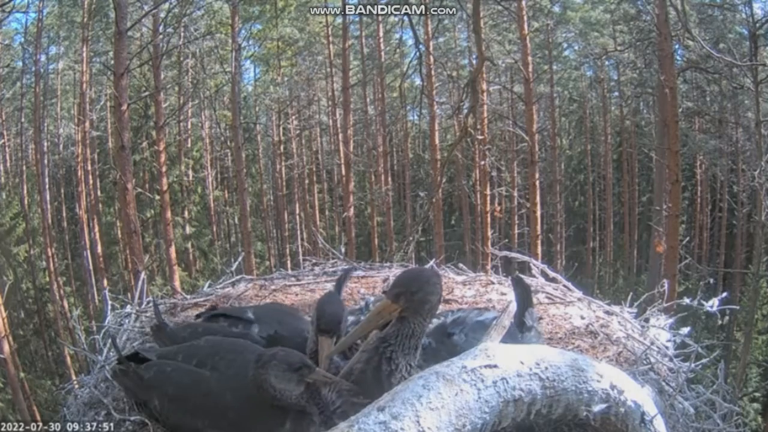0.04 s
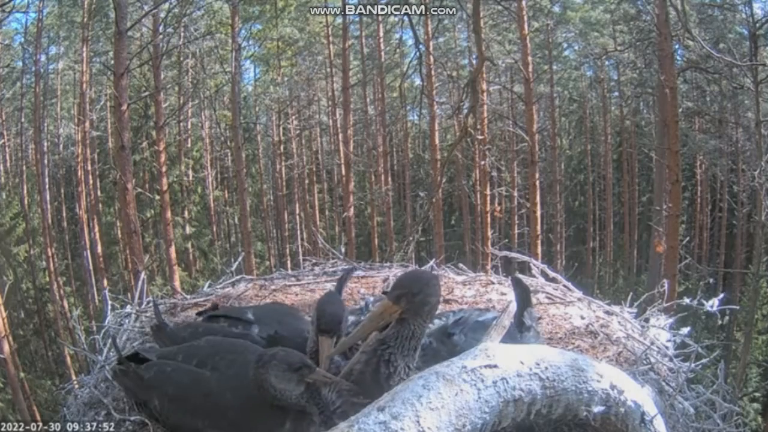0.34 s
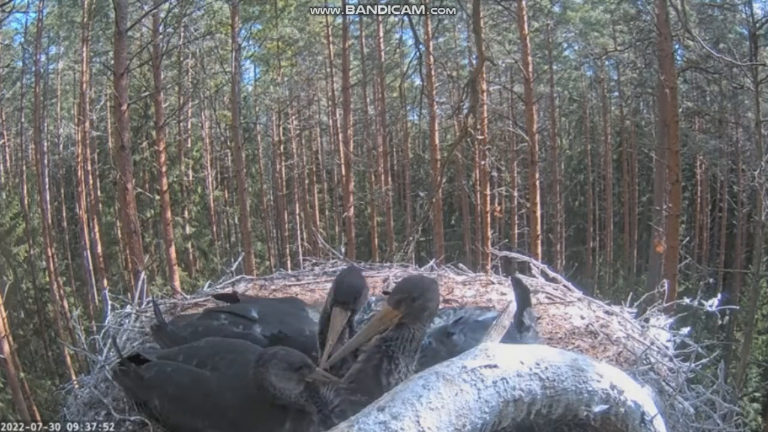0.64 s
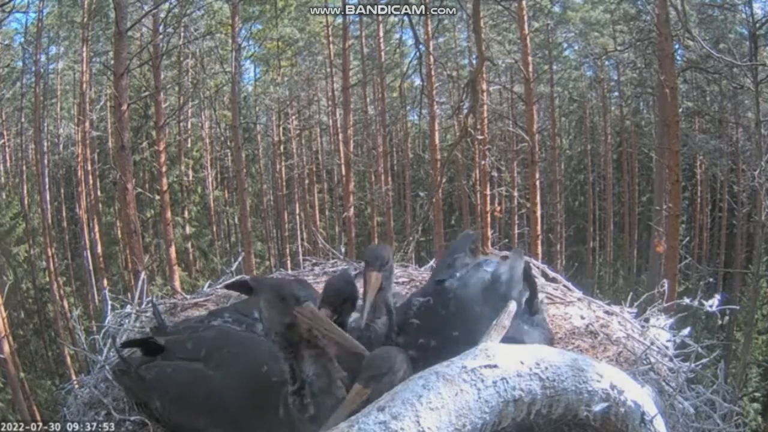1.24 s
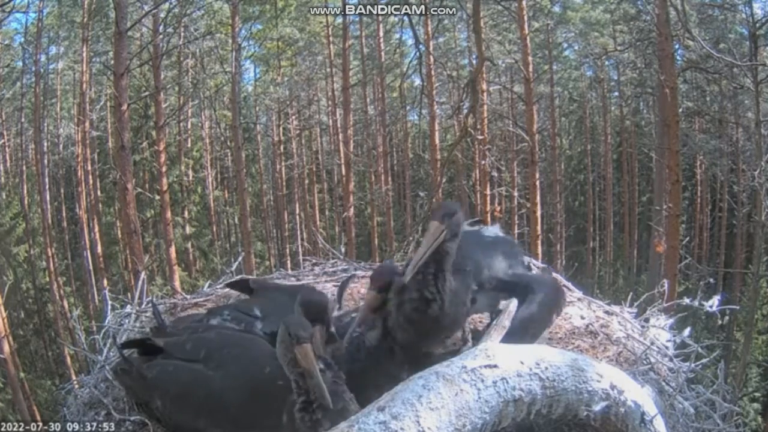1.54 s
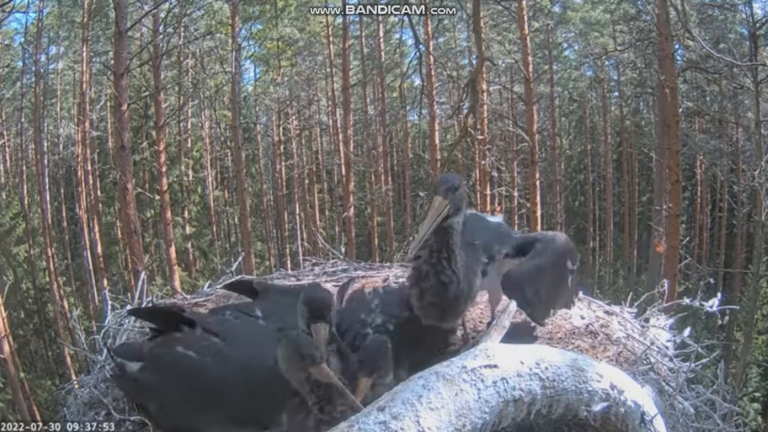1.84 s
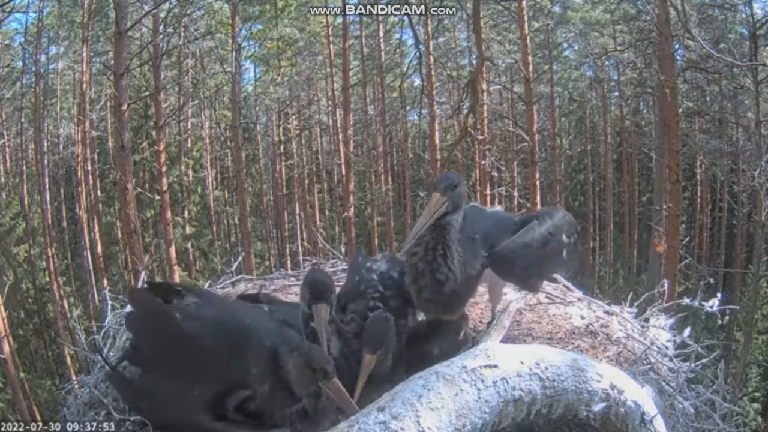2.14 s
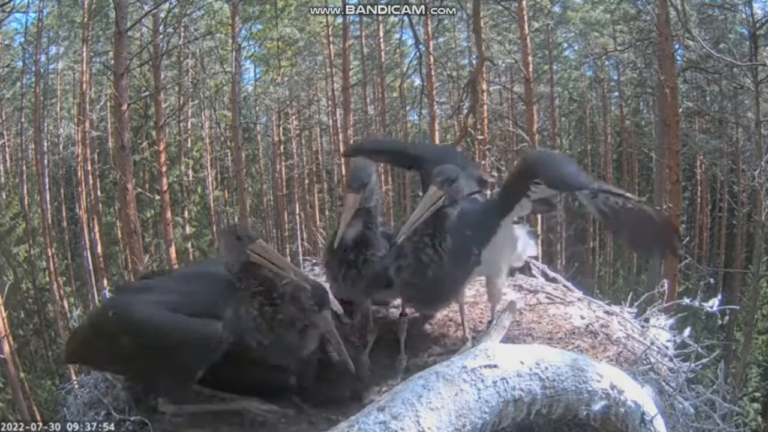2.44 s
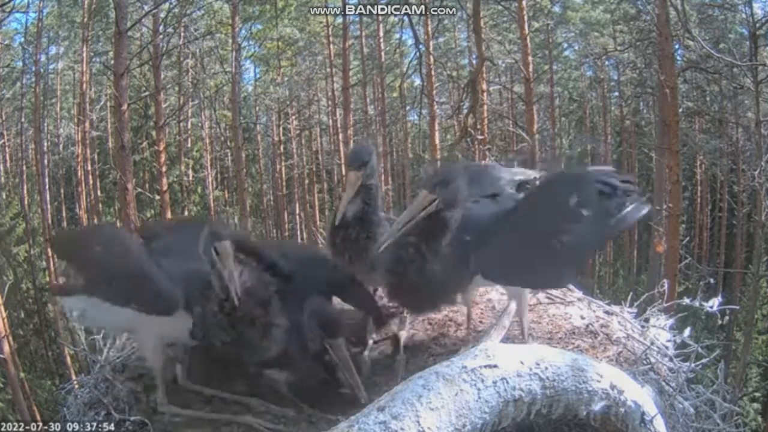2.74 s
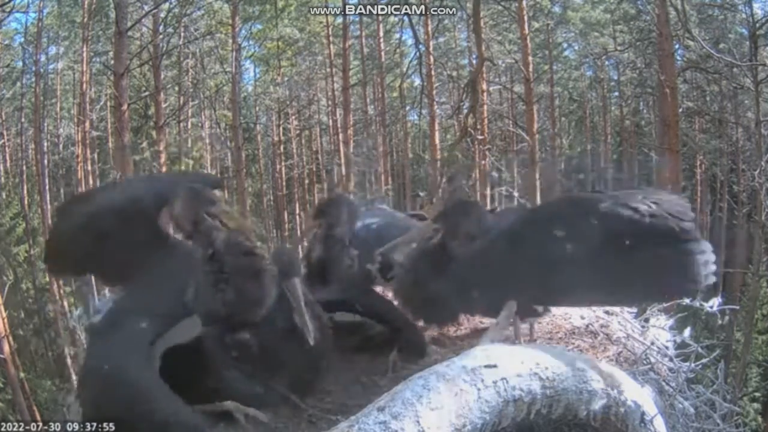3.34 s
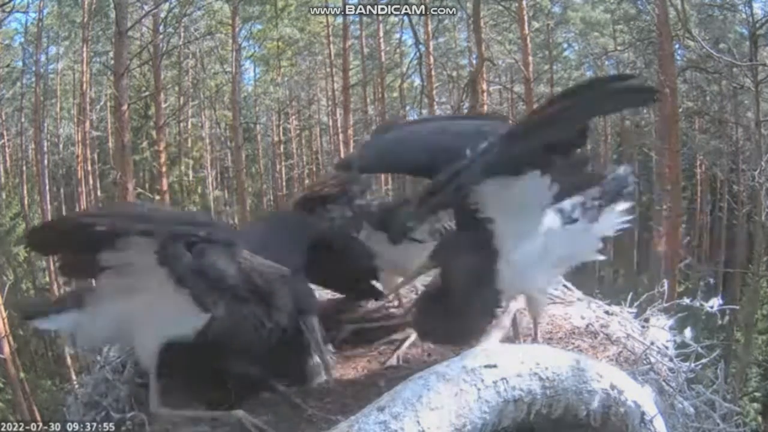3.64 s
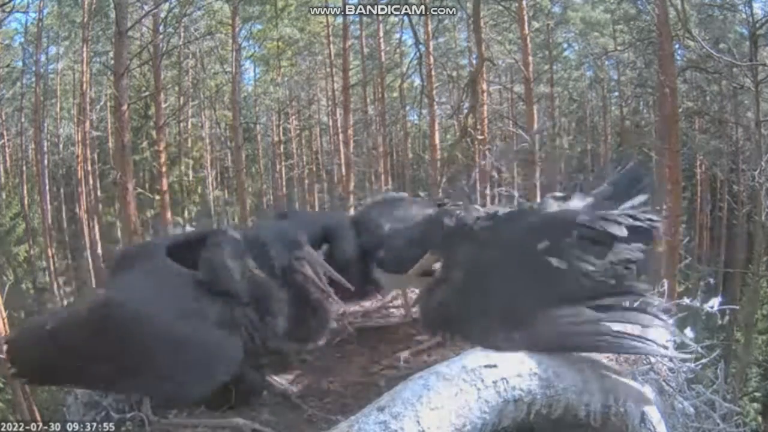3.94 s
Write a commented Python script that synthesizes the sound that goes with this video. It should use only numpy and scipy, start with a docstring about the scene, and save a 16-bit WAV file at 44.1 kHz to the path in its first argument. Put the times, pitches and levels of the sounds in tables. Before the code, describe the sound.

Young storks beg with rapid whistles and harsh rasps, flapping in a forest nest.

```python
"""A stick nest high in a quiet forest, one microphone close to the young storks in it.
They beg about nine calls a second: thin gliding whistles, short low grunts from pulses ringing the
throat, and harsh rasps where the voice breaks up. As more birds join, the rasps take over.
Close by, wings beat, feathers and twigs rustle, chicks chirp and sticks tick.
The trees return a faint echo."""
import sys
import numpy as np
from scipy import signal
from scipy.fft import rfft, irfft, next_fast_len
from scipy.io import wavfile

SR = 44100
rng = np.random.default_rng(int(sys.argv[2]) if len(sys.argv) > 2 else 0)


def master(y):
    """Save y as 16-bit WAV."""
    cut = np.clip(np.atleast_2d(y).T, -1, 1)
    pcm = np.round(cut * 32767)  # scale
    wavfile.write(sys.argv[1], SR, pcm.astype(np.int16))


N = 176400

# Rasps close to the microphone: t/s, length/s, level/dB
RASP_CALLS = [(1.646, 0.071, -51), (1.769, 0.053, -47.5), (1.861, 0.054, -50.5), (1.966, 0.039, -46),
              (2.06, 0.052, -45.5), (2.167, 0.04, -43), (2.264, 0.05, -46), (2.355, 0.076, -41),
              (2.45, 0.073, -42.5), (2.551, 0.073, -44), (2.633, 0.1, -43.5), (2.74, 0.1, -45.5),
              (2.849, 0.07, -46.5), (2.961, 0.05, -45), (3.048, 0.065, -42), (3.137, 0.053, -38.5),
              (3.23, 0.057, -38.5), (3.313, 0.16, -43), (3.488, 0.11, -44), (3.598, 0.085, -41.5),
              (3.692, 0.076, -41.5), (3.773, 0.077, -38), (3.88, 0.013, -32), (3.907, 0.035, -42.5),
              (3.979, 0.021, -49)]
def rasp(start, length, db, calm_hz=3230, frantic_hz=4112, puffs_per_s=230, note_s=.014):
    """The voice breaks into rough squeals over uneven puffs, shriller as the birds get excited."""
    n = int(length * SR)
    t = np.arange(n) / SR
    centre_hz = calm_hz + (frantic_hz - calm_hz) * (start * SR / N) ** 2
    cycles = np.cumsum(puffs_per_s * np.exp(.27 * drift(n, 150))) / SR
    gate = np.exp(-(cycles % 1) / .8)
    puffs = gate * noise(n)
    harsh = colour(resonate(puffs, centre_hz, width_hz=1800) + .4 * puffs, throat(start))
    notes = np.zeros(n)
    for s in np.arange(0, length, note_s / 2):  # overlapping scraps of tone leap about the centre
        m = int(note_s * rng.uniform(1, 1.7) * SR)
        hz = centre_hz * np.exp(.198 * rng.uniform(-1, 1)) * (1 + .0487 * drift(m, 200))
        add(notes, s - note_s / 2, np.hanning(m) * np.sin(phase_of(hz)) * rng.exponential())
    notes = colour(notes * (gate + .5), throat(start))
    voice = squeal(n, centre_hz * rng.uniform(.16, .3), wobble=.04)
    voice = colour(voice * (gate + .5), throat(start))
    edges = np.clip(np.minimum(t, length - t) / .0048, 0, 1)
    flicker = amp(drift(n, 160))
    return amp(db) * edges * unit((harsh + amp(2) * notes + amp(-5) * voice) * flicker)


# Spectrum of a young stork's throat: f/Hz, level/dB
THROAT_SPECTRUM = [(200, -35), (600, -5.5), (1050, 2), (1700, -10.5), (2300, -1), (3000, -2), (4300, -4),
                   (5200, -19.5), (6900, -42.5), (9300, -29), (15000, -50.5)]
def throat(s, squabble_s=2.76):
    """The colour of the voice at time s; its upper edge rises once the squabble breaks out."""
    stretch = 1 + .11 * np.clip((s - squabble_s) * 2, 0, 1)
    return [(hz * (stretch if 4000 < hz < 8000 else 1), db) for hz, db in THROAT_SPECTRUM]


def squeal(n, hz, wobble):
    """A hoarse, nearly held voice with a weak fundamental and uneven harmonics."""
    from_crest = np.linspace(-1, 1, n) + rng.uniform(-1, 1)
    phase = phase_of(hz * np.exp(-.04 * from_crest ** 2) * (1 + wobble * drift(n, 300)))
    return sum(min(k / 3, 1) * rng.rayleigh() * np.cos(k * phase + 2 * np.pi * rng.random())
               for k in range(1, 13))


# Whistles, close: t/s, length/s, first f/Hz, middle f/Hz, last f/Hz, level/dB
WHISTLE_CALLS = [(0.506, 0.041, 2370, 3050, 2380, -65.5), (0.6, 0.054, 2480, 2960, 2570, -57.5),
                 (0.718, 0.048, 2300, 4030, 3520, -48.5), (1.588, 0.0069, 1820, 3520, 3970, -39.5),
                 (2.083, 0.017, 2770, 3720, 4150, -40), (2.159, 0.049, 3760, 3270, 4270, -42.5),
                 (2.264, 0.029, 3920, 3340, 3730, -37), (2.46, 0.031, 3910, 3840, 4550, -32.5),
                 (2.527, 0.092, 4560, 4050, 3810, -37.5), (2.648, 0.046, 4390, 3924, 3680, -32),
                 (2.752, 0.016, 4480, 3930, 3370, -37), (3.237, 0.025, 4920, 4330, 4140, -37.5),
                 (3.268, 0.011, 3030, 3150, 3180, -35), (3.359, 0.012, 2860, 3250, 3380, -31.5),
                 (3.465, 0.019, 3830, 4050, 4250, -31.5), (3.519, 0.0092, 4500, 4300, 4600, -32),
                 (3.551, .024, 4560, 4490, 4170, -37.5), (3.682, 0.028, 9350, 9350, 9350, -55.5),
                 (3.756, 0.015, 4460, 4480, 4430, -38), (3.776, 0.012, 4530, 4420, 4360, -34)]
def whistle(length, first_hz, middle_hz, last_hz, db):
    """A nearly pure tone bends through three pitches, fluttering, in a thin band of air noise."""
    n = int(length * SR)
    u = np.linspace(0, 1, n)
    bend = np.polyfit([0, .5, 1], [first_hz, middle_hz, last_hz], 2)
    hz = np.polyval(bend, u) * (1 + .014 * drift(n, 360))
    phase = phase_of(hz)
    flutter = 1 + .75 * np.tanh(drift(n, 520))
    tone = unit((np.sin(phase) + amp(-38.5) * np.sin(2 * phase)) * flutter)
    air = colour(resonate(noise(n), hz, width_hz=900), THROAT_SPECTRUM)
    return amp(db) * abs(np.sin(np.pi * u)) ** .77 * (tone + amp(-30) * air)


# Twitters, close: t/s, length/s, top f/Hz, landing level/dB
TWITTER_CALLS = [(.595, 0.098, 4350, -52), (0.746, 0.045, 5000, -39), (0.814, 0.09, 4750, -39),
                 (0.931, 0.062, 4300, -48), (0.973, 0.029, 4700, -37), (1.016, 0.084, 5000, -49),
                 (1.122, .1, 4740, -48), (1.778, 0.067, 4490, -40.5), (1.862, 0.075, 5000, -39.5),
                 (1.952, 0.086, 5100, -39.5), (2.055, 0.093, 4980, -40), (2.174, 0.079, 4900, -40.5),
                 (2.276, 0.092, 4880, -37), (2.986, 0.089, 5150, -34), (3.83, .06, 5900, -36.5),
                 (3.938, 0.069, 5500, -38)]
def twitter(length, top_hz, db, foot_hz=3430, fade_db_per_hz=.012, swell_db=7, ragged_db=5):
    """A ragged tone arches up from the throat's resonance, fades at the top and lands loudly again."""
    n = int(length * SR)
    u = np.linspace(0, 1, n)
    lift_hz = (top_hz - foot_hz) * np.sin(np.pi * np.minimum(u / .9, 1)) ** 2
    phase = phase_of((foot_hz + lift_hz) * (1 + .022 * drift(n, 200)))
    level_db = db - fade_db_per_hz * lift_hz - swell_db * (1 - u) + ragged_db * np.tanh(drift(n, 120))
    flutter = 1 + .75 * np.tanh(drift(n, 350))
    return amp(level_db) * signal.windows.tukey(n, .2) * np.sin(phase) * flutter


# Steady throat resonances: f/Hz, width/Hz, level/dB
THROAT_RESONANCES = [(438, 273, -16), (3110, 850, -12)]
# Grunts, close: t/s, length/s, pitch f/Hz, level/dB, upper resonance level/dB
GRUNT_CALLS = [(0.682, 0.0092, 428, -53, -6.5), (0.787, 0.011, 380.4, -44.5, 4.5),
               (0.89, 0.019, 373.6, -44, -0.5), (1.005, 0.017, 372.8, -45, -1),
               (1.107, 0.026, 375.4, -43, -4), (1.218, 0.03, 367.3, -44, -2.5),
               (1.326, 0.038, 370.7, -42, -3), (1.44, 0.011, 329.4, -46.5, -5.5),
               (1.528, 0.011, 313, -48, -26), (1.542, 0.035, 302.4, -46, -4.5),
               (1.665, 0.023, 410.4, -51, -7), (1.729, 0.015, 302, -44, -12),
               (1.814, 0.028, 313.6, -48, -9), (1.929, 0.015, 430.2, -45.5, -11),
               (2.033, 0.017, 423, -44, -15), (2.136, 0.023, 437.5, -43, -11),
               (2.245, 0.022, 435, -44, -12.5), (2.356, 0.019, 431, -41.5, -24),
               (2.685, 0.026, 375.2, -42, 1.5), (2.772, 0.02, 354, -46, -4), (2.879, 0.022, 346, -48, -4),
               (2.966, 0.031, 279.8, -42.5, -4.5), (3.179, 0.031, 329.2, -47.5, -5),
               (3.595, 0.014, 355, -47, -3), (3.814, 0.039, 387, -42, -0.5)]
def grunt(start, length, pitch_hz, db, upper_db, sag=.33, jitter=.07):
    """Sagging pulses ring the throat: hollow with the bill nearly shut, hoarser with excitement."""
    n = int(length * SR)
    u = np.minimum(np.arange(n + SR // 100) / n, 1)  # 10 ms extra to ring out
    cycles = np.cumsum(pitch_hz * (1 + sag * (.5 - u) + jitter * drift(len(u), 300))) / SR
    pulses = unit(sum(np.cos(2 * np.pi * k * cycles) for k in range(1, 13)))
    puffs = unit(noise(len(u)) * (1 - cycles % 1))
    excitement = start * SR / N
    rough = .3 + .43 * excitement ** 2
    drive = ((1 - rough) * pulses + rough * 2 * puffs) * abs(np.sin(np.pi * u)) ** .7
    hollow = (691 + 320 * excitement, 636 * max(amp(.2 * upper_db), .5), 0)
    resonances = list(THROAT_RESONANCES) + [hollow, (1409, 243, upper_db)]
    voice = sum(amp(level) * resonate(drive, hz, width) for hz, width, level in resonances)
    return amp(db) * unit(voice) * np.sqrt(.5 * len(u) / n)


# Modes of a quick chirp and of a nest stick: f/Hz, t60/s, level/dB
CHIRP_MODES = [(2800, 0.0088, 2.5), (3610, 0.013, -1)]
STICK_MODES = [(316, 0.027, -6.5), (706, 0.02, 16.5), (1130, 0.0077, 26.5), (2760, 0.0042, -15)]
# The chicks' very short, click-like chirps near 3 kHz, and knocks on the sticks: t/s, level/dB
QUICK_CHIRPS = [(2.502, -40), (2.645, -32), (2.743, -29.5), (2.855, -32.5), (3.335, -26.5)]
STICK_KNOCKS = [(1.174, -65), (2.229, -60), (3.404, -63), (3.821, -52)]
def short_ring(modes, db, rise_s=.00076):
    """A quick chirp or a knocked stick: a few fast-dying tones, tuned a little differently each time."""
    t = np.arange(SR // 20) / SR
    ring = sum(amp(level - 60 * t / t60) * np.sin(2 * np.pi * hz * rng.uniform(.93, 1.07) * t)
               for hz, t60, level in modes)
    return 2 * amp(db) * ring * (1 - np.exp(-(t / rise_s) ** 2))


# Spectrum of the air a wing moves: f/Hz, level/dB
WING_SPECTRUM = [(25, 2.5), (140, -3.5), (300, -12), (900, -21), (4000, -41)]
# Wing beats near the microphone: peak t/s, level/dB
WING_BEATS = [(2.553, -49), (3.049, -46), (3.377, -53)]
def wing(db, half_width_s=.0046):
    """A soft push of air from one wing beat."""
    t = np.arange(SR // 5) / SR - .1
    air = colour(noise(len(t)), WING_SPECTRUM)
    return amp(db) * air / (1 + (t / half_width_s) ** 2) * np.hanning(len(t))


# Feathers on the nest: t/s, length/s, level/dB
FEATHER_SWISHES = [(3.759, .04, -56)]
def swish(length, db):
    """Stiff feathers scrape over the sticks in a crisp burst."""
    n = int(length * SR)
    return amp(db) * np.hanning(n) * unit(noise(n) * np.exp(.5 * drift(n, 600)))


# Commotion behind the main calls: t/s, rustle level/dB, chatter level/dB
COMMOTION = [(.45, -76, -90), (.6, -73.5, -61), (1.3, -69.5, -61.5), (1.5, -73.5, -63.5),
             (1.9, -67.5, -63.5), (2.601, -65, -48.5), (2.94, -67.5, -68.5), (3.07, -56.5, -44),
             (3.22, -63, -52), (3.37, -59, -40.5), (4, -57, -48)]
def chatter(low_hz=950, high_hz=2000, gap_s=.015):
    """The other chicks squeal hoarsely over one another."""
    voices = np.zeros(N)
    for s in np.arange(0, N / SR, gap_s):
        n = int(.02 * 2 ** rng.uniform(-.91, 1) * SR)
        start = s + rng.random() * gap_s
        gain = rng.uniform(.56, 1)
        call = np.hanning(n) * squeal(n, rng.uniform(low_hz, high_hz), wobble=.035)
        add(voices, start, gain * colour(call, throat(s)))
    times, _, db = np.transpose(COMMOTION)
    return amp(np.interp(np.arange(N) / SR, times, db)) * unit(voices * (1 + .5 * drift(N, 500)))


# Spectrum of feathers and twigs in the nest: f/Hz, level/dB
RUSTLE_SPECTRUM = [(35, 5.5), (120, -3.5), (400, -3.5), (1100, 0.5), (5700, -10.5), (7200, -14),
                   (10000, -9.5), (15000, -17)]
def rustle(snaps_per_s=900):
    """Feathers brush softly and small twigs crackle as the birds get up."""
    snaps = unit((rng.random(N) < snaps_per_s / SR) * noise(N))
    brushing = (noise(N) + .5 * snaps) * amp(drift(N, 40))
    times, db, _ = np.transpose(COMMOTION)
    return amp(np.interp(np.arange(N) / SR, times, db)) * colour(brushing, RUSTLE_SPECTRUM)


def echo(x, db=-15, t60_s=.35):
    """The trunks around the nest scatter its sound back to the microphone."""
    t = np.arange(SR // 2) / SR
    tail = noise(len(t)) * amp(-60 * t / t60_s)
    return amp(db) * signal.fftconvolve(x, tail / np.linalg.norm(tail))[:N]


# Spectrum of the forest farther off: f/Hz, level/dB
FOREST_SPECTRUM = [(30, -7.5), (900, -3.5), (1800, -16), (4000, -22.5), (15000, -23.5)]
def forest(db=-71):
    """A steady, soft hush beyond the nest."""
    return amp(db) * colour(noise(N), FOREST_SPECTRUM)


def amp(db):
    """Decibels to gain."""
    return 10 ** (np.asarray(db) / 20)


def unit(x):
    """Scales to rms 1."""
    return x / np.sqrt(np.mean(x ** 2) + 1e-20)


def phase_of(hz):
    """Running phase of a moving pitch, in radians."""
    return 2 * np.pi * np.cumsum(hz) / SR


def add(mix, s, sound):
    """Mixes a sound in at time s."""
    part = mix[max(round(s * SR), 0):][:len(sound)]
    part += sound[:len(part)]


def colour(x, spectrum):
    """Filters by a spectrum; rms 1."""
    size = next_fast_len(2 * len(x))
    hz, db = np.transpose(spectrum)
    gain = amp(np.interp(np.log(np.fft.rfftfreq(size, 1 / SR) + 1), np.log(hz), db))
    return unit(irfft(rfft(x, size) * gain, size)[:len(x)])


def noise(n):
    """White noise."""
    return np.random.default_rng(rng.integers(2 ** 31)).standard_normal(n)


def drift(n, hz):
    """Smooth random motion up to a rate; rms about 1."""
    size = next_fast_len(n + 4096)
    lowpass = np.exp(-(np.fft.rfftfreq(size, 1 / SR) / hz) ** 2)
    return unit(irfft(rfft(noise(size)) * lowpass, size))[:n]


def resonate(x, hz, width_hz):
    """A steep resonance of gain 1, steady or moving."""
    carrier = np.exp(1j * phase_of(hz * np.ones(len(x))))
    pole = np.exp(-np.pi * width_hz / SR)
    envelope = signal.lfilter([(1 - pole) ** 2], [1, -2 * pole, pole ** 2], x / carrier)
    return 2 * (carrier * envelope).real


def scene():
    """Calls and movements close up in the nest, over the hush of the forest."""
    nest = rustle() + chatter()
    for start, *row in WHISTLE_CALLS:
        add(nest, start, whistle(*row))
    for start, *row in TWITTER_CALLS:
        add(nest, start, twitter(*row))
    for start, *row in GRUNT_CALLS:
        add(nest, start, grunt(start, *row))
    for start, *row in RASP_CALLS:
        add(nest, start, rasp(start, *row))
    for start, db in QUICK_CHIRPS:
        add(nest, start, short_ring(CHIRP_MODES, db))
    for start, db in STICK_KNOCKS:
        add(nest, start, short_ring(STICK_MODES, db))
    for start, *row in FEATHER_SWISHES:
        add(nest, start, swish(*row))
    for peak_s, db in WING_BEATS:
        push = wing(db)
        add(nest, peak_s - len(push) / SR / 2, push)
    return (nest + echo(nest) + forest())[None]


def record(dry, edge_hz=15700):
    """The nest camera's mono microphone channel cuts off the highest treble."""
    lowpass = signal.firwin(511, edge_hz, window=("kaiser", 9), fs=SR)
    return signal.oaconvolve(dry, lowpass[None], "same")


dry = scene()
out = record(dry)
master(out)
```